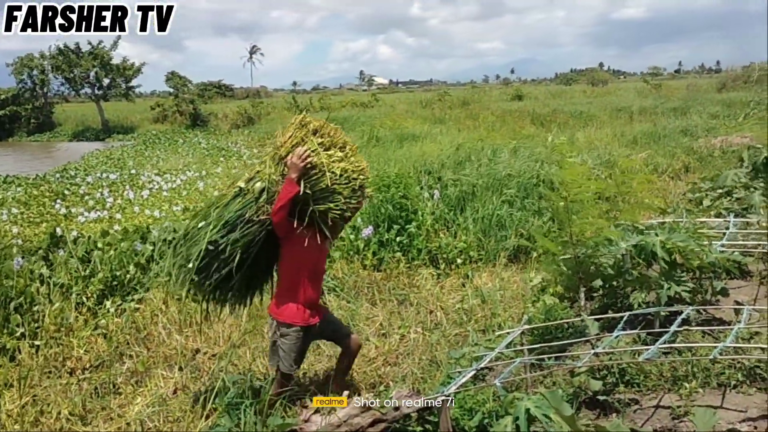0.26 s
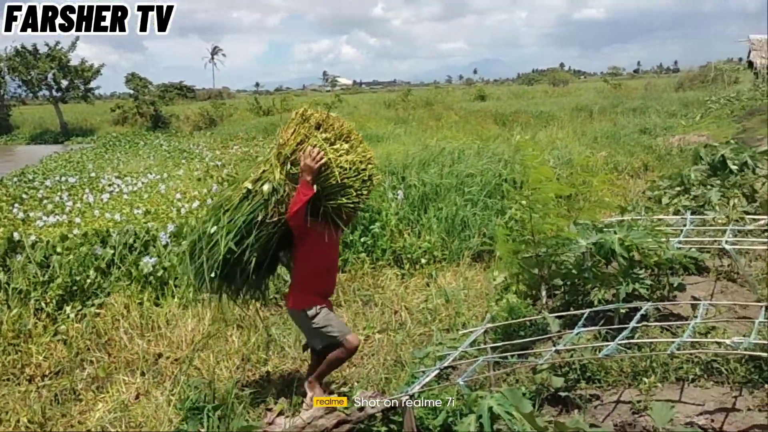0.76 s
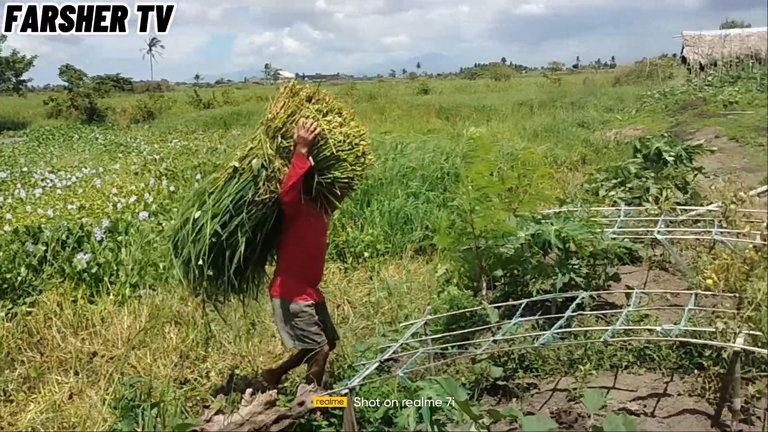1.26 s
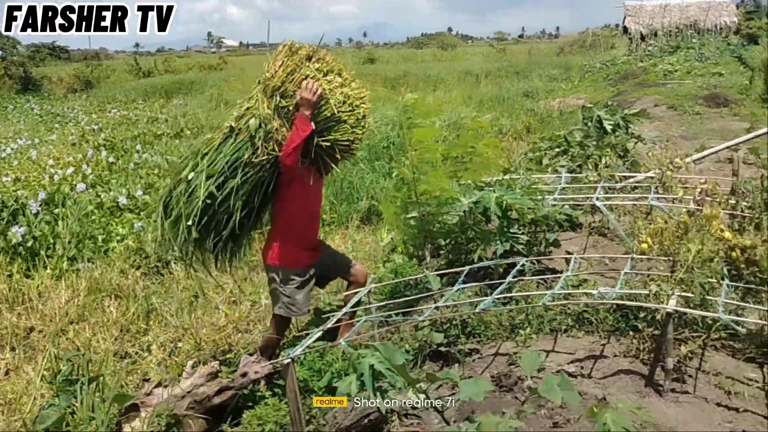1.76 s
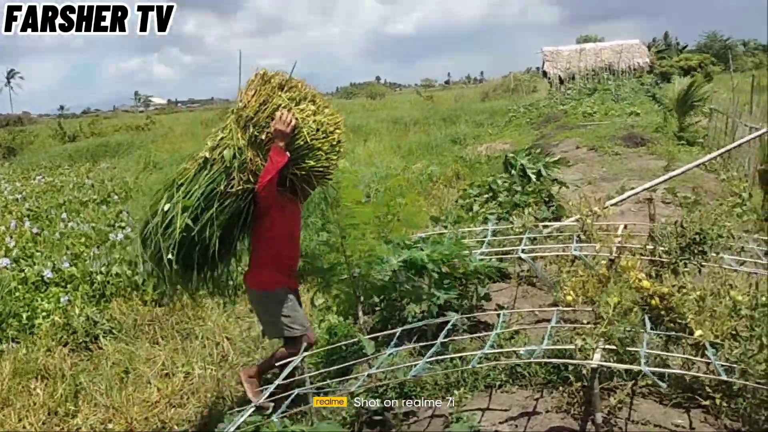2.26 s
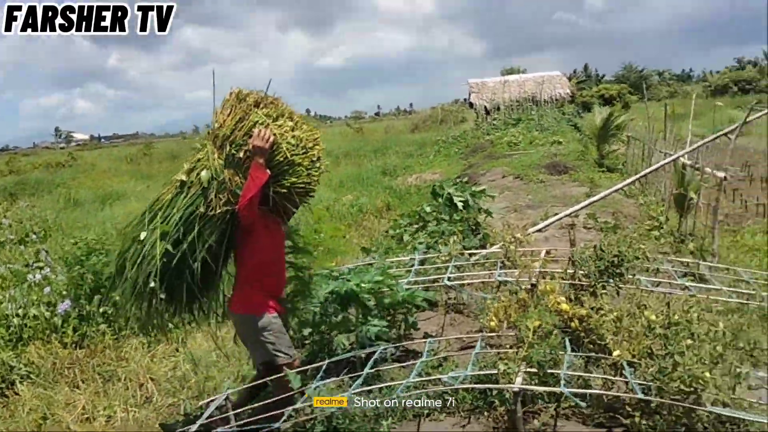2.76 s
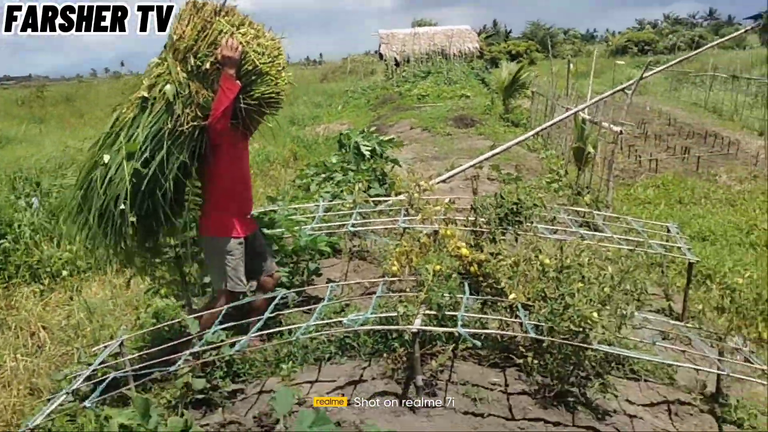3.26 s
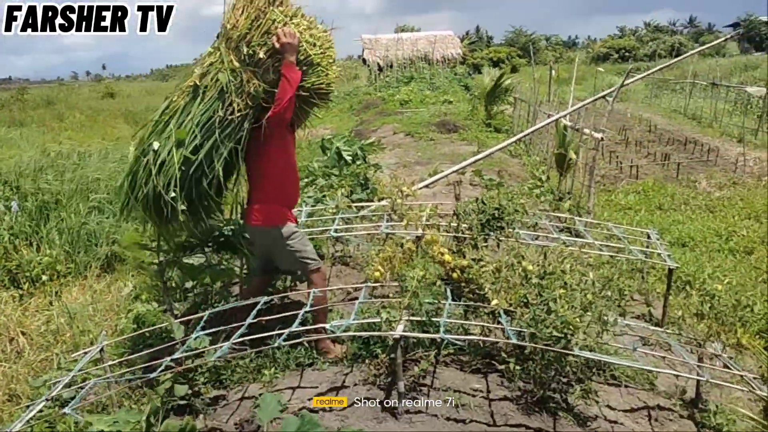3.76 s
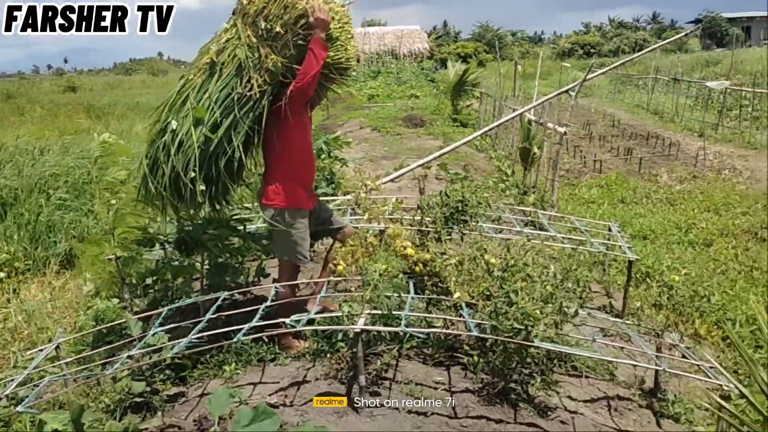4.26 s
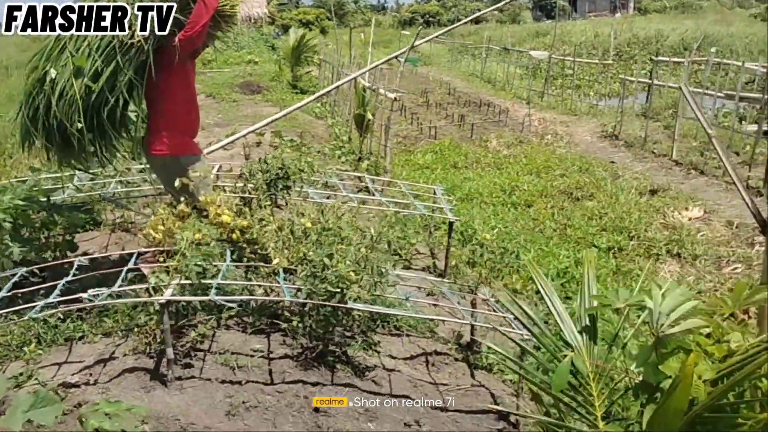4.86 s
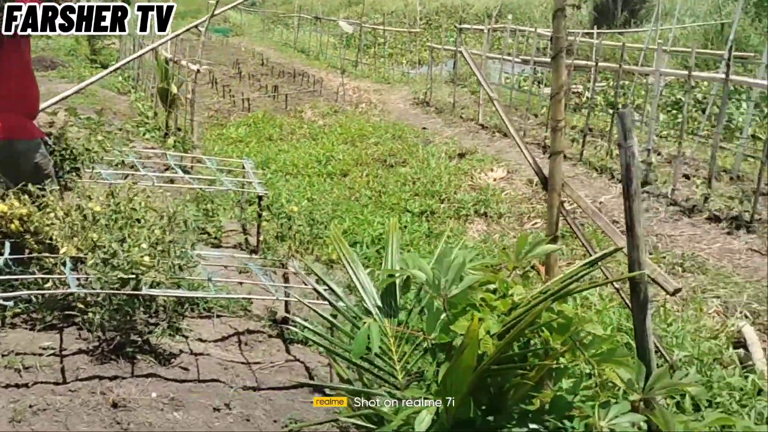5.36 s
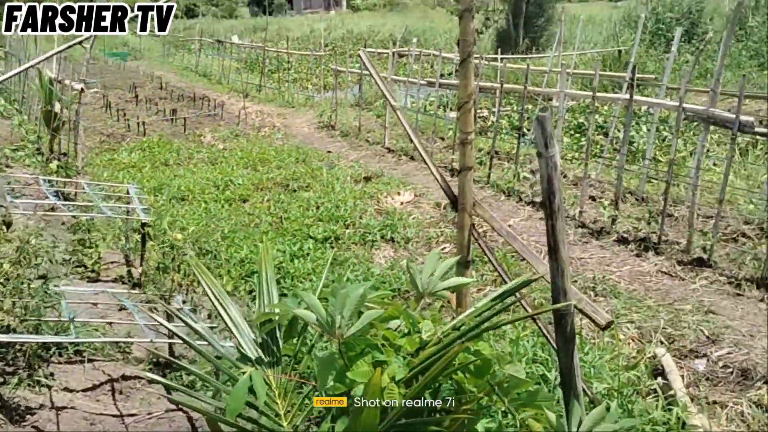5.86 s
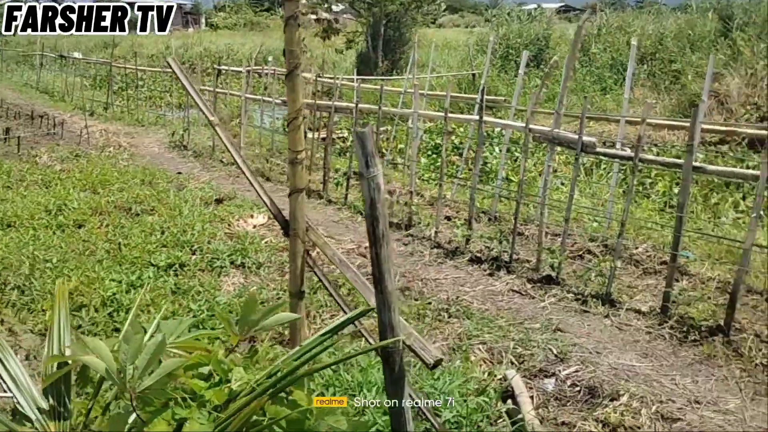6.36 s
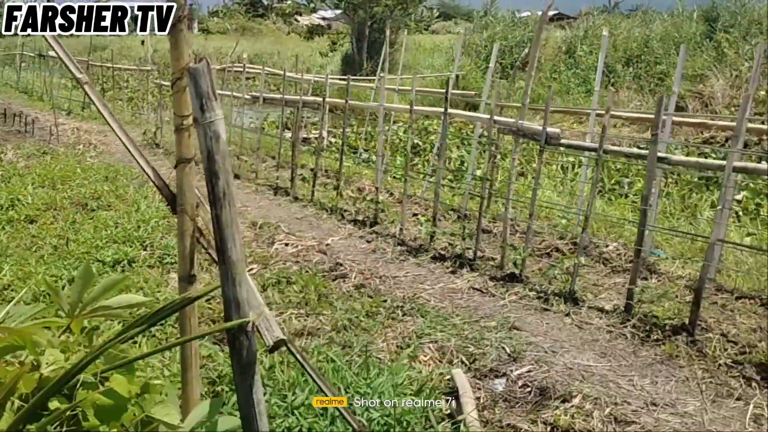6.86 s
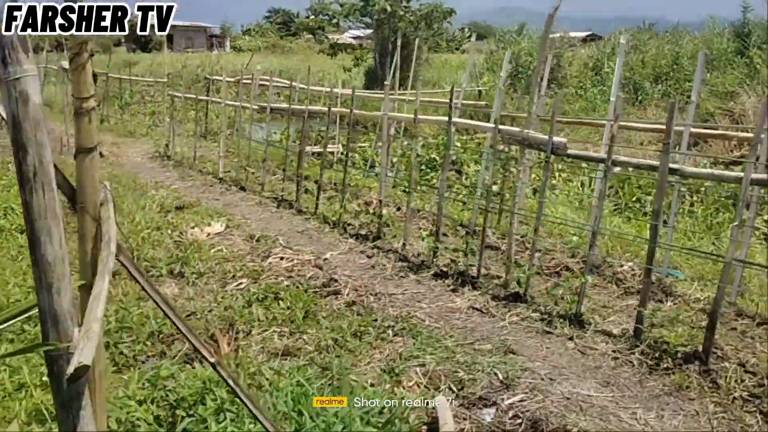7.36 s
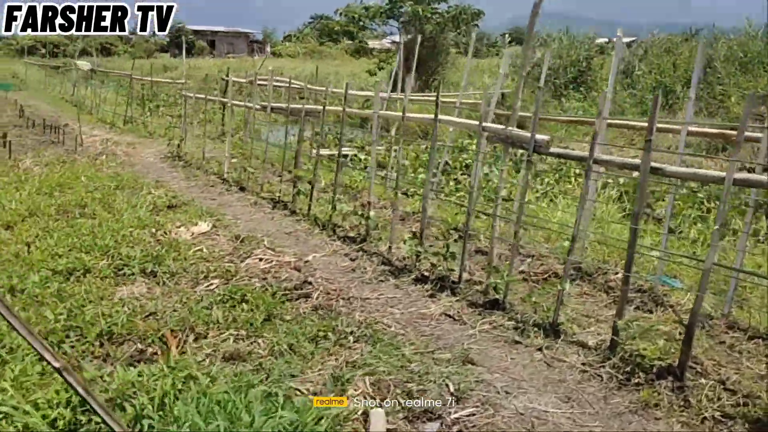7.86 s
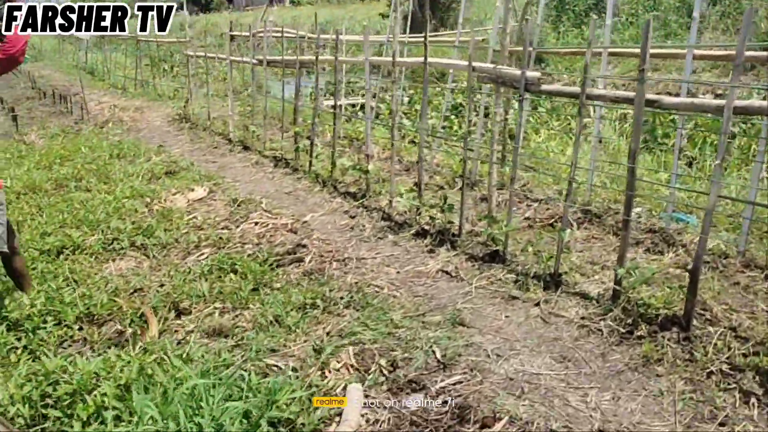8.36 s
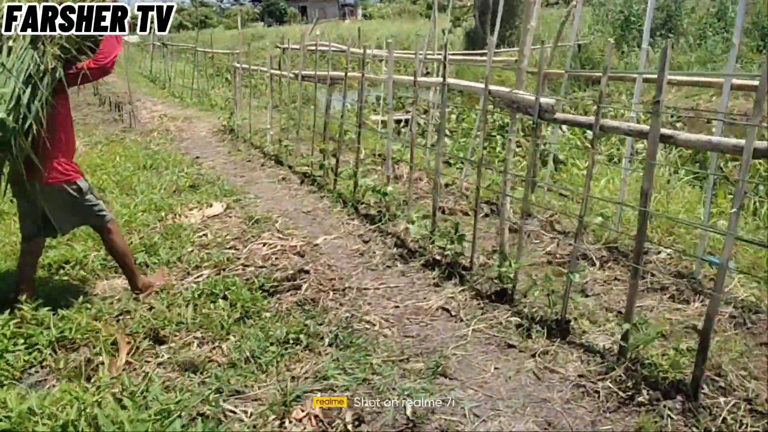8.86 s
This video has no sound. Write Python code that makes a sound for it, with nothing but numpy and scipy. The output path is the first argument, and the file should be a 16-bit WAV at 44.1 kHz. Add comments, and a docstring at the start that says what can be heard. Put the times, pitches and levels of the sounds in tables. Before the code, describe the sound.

Gusts bump the microphone strongly for the first two seconds, with soft swishes of carried grass a few metres away. A lull follows with faint chirps and a thin insect buzz. After a hard wind thump, dry stems crunch, then snap loudly close by, with bright hissing rustle continuing to the end. Open farmland, no echo, distant leaves and low roar.

```python
"""Wind thumps the microphone first, while someone walks a few metres off in a vegetable plot, then close by.
They carry a bundle of cut grass: stems crunch and snap, and blades hiss, as shaped noise and short rings.
Far birds chirp (gliding sine tones), a grasshopper buzzes once (pulsed tone) and a faint, wavering hum passes.
Wind is lumpy low noise with single pushes; far leaves and a dull roar are steady noise behind it all."""
import sys
import numpy as np
from scipy import signal
from scipy.fft import rfft, irfft, next_fast_len
from scipy.io import wavfile
from scipy.ndimage import uniform_filter1d, map_coordinates

SR = 44100
rng = np.random.default_rng(int(sys.argv[2]) if len(sys.argv) > 2 else 0)


def to_wav(sig):
    """Store sig (one row per channel, or 1-D mono) as 16-bit WAV at the path in sys.argv[1].

    Samples outside -1..1 are clipped; the rate is SR.
    """
    pcm = np.clip(np.atleast_2d(sig), -1, 1) * 32767
    pcm = np.round(pcm).astype(np.int16)
    wavfile.write(sys.argv[1], SR, pcm.T)  # frames by channels


N = 402191  # length in samples

# Colour tables give only the balance of the noise; its loudness is set elsewhere.
# Colour of the crunching stems: pitch_hz, relative_db
STEM_COLOUR = [(200, -39), (450, -13), (1000, -4.5), (2150, 0.5), (3400, -6.5), (4100, -11.5),
               (6000, -21.5), (8100, -24), (10000, -25), (15600, -65)]
# Colour of the hissing grass blades: pitch_hz, relative_db
BLADE_COLOUR = [(1500, -45), (4000, -2.5), (6000, -20), (8200, -4.5), (9600, -13.5), (11800, -12.5),
                (14000, -6.5), (15600, -0.5)]
# Colour of fibres crushed after a snap: pitch_hz, relative_db
CRUSH_COLOUR = [(200, -28), (450, -20), (900, 1), (1500, 0), (2200, 5.5), (3200, -8), (4300, -16),
                (6000, -17), (8100, -26), (15600, -50)]
# Swishes of the bundle at each stride: start_s, hold_s, stems_db, blades_db
SWISHES = [(.17, 0.011, -52, -47.5), (.24, .22, -60.5, -58), (.5, 0.033, -61.5, -58),
           (.63, 0.089, -61.5, -56), (.75, 0.076, -63, -57.5), (1.12, 0.014, -75, -63),
           (1.51, 0.016, -60, -64), (1.64, 0.035, -55.5, -57.5), (1.71, 0.11, -63, -59.5),
           (2.355, 0.013, -71, -58), (2.785, 0.024, -64, -58), (2.885, 0.0094, -66, -54.5),
           (3.2, 0.1, -64, -60.5), (3.31, 0.044, -62, -56.5), (3.42, 0.061, -68, -60),
           (3.8, 0.33, -71, -64), (4.25, 0.016, -64, -71), (5.35, 0.13, -64, -68), (5.58, 0.04, -50, -56),
           (5.7, 0.17, -60.5, -62.5), (6.41, .07, -54, -58.5), (6.5, .04, -46.5, -61),
           (6.57, 0.042, -51.5, -56), (6.86, 0.033, -47.5, -47), (6.91, 0.022, -42, -41),
           (6.99, 0.091, -51.5, -49.5), (7.22, 0.14, -58.5, -54), (7.375, .08, -46, -40.5),
           (7.485, 0.044, -40, -41.5), (7.56, 0.034, -42, -43), (7.65, 0.091, -53.5, -49),
           (7.96, 0.12, -57.5, -51), (8.14, 0.096, -53, -47.5), (8.32, 0.079, -46.5, -42.5),
           (8.41, 0.12, -45, -46), (8.75, 0.2, -51.5, -47.5), (9.075, 0.018, -53, -50),
           (9.105, .02, -46.5, -40.5)]
# Rustle between the swishes: time_s, stems_db, blades_db
QUIET_RUSTLE = [(0, -60.5, -62.5), (1, -62.5, -64), (1.4, -60, -65), (2, -64.5, -68), (2.7, -62.5, -65.5),
                (4.1, -61.5, -62.5), (4.85, -60.5, -65), (5.05, -63, -66.5), (5.55, -58, -62.5),
                (6.1, -67, -71), (6.37, -66.5, -69), (6.7, -56.5, -60.5), (7.9, -54.5, -55.5),
                (8.1, -57, -64), (8.65, -55.5, -50.5), (9.12, -54, -44)]
# Stems breaking: start_s, peak_db, ring_hz, hollow_body_db (relative to the peak)
SNAPS = [(.168, -41, 1560, -8), (.373, -45, 2480, -3), (.795, -45, 3000, -17), (0.836, -44, 2500, -20),
         (.849, -46, 3300, -18), (1.185, -47, 1470, -5), (1.308, -33.5, 1060, -11), (1.335, -39, 930, -7),
         (1.511, -48, 2680, -9), (2.075, -41.5, 2600, -18), (2.893, -47, 2430, -12),
         (5.324, -34, 1750, -2.5), (5.517, -40.5, 2360, -21), (5.552, -35.5, 2130, -26),
         (5.573, -40, 2490, -20), (5.599, -43, 2330, -22), (5.902, -37, 2260, -15), (6.394, -46, 1870, -7),
         (6.425, -33.5, 1770, -15), (6.473, -34, 2370, -23), (6.494, -33, 1700, -32),
         (6.508, -24.5, 1360, -41), (6.513, -22.5, 1600, -35), (6.52, -28, 1910, -37),
         (6.527, -25.5, 1450, -35), (6.586, -18, 1480, -11.5), (6.644, -37.5, 1520, -10),
         (6.854, -33, 2030, -20), (6.875, -37, 2240, -20), (6.921, -32, 2190, -29), (6.937, -37, 2300, -25),
         (6.954, -40, 2600, -25), (7.092, -32.5, 1780, -29), (7.116, -38, 2200, -25),
         (7.222, -37.5, 2190, -18), (7.366, -50, 1660, -24), (7.437, -32, 2010, -11),
         (7.482, -30, 1900, -12), (7.499, -33, 1500, -20), (7.552, -41, 1500, -20), (7.566, -18, 2070, -37),
         (7.577, -21, 1330, -29), (7.642, -33, 1530, -26), (7.666, -33, 1400, -26), (7.758, -34, 2220, -32),
         (7.847, -38.5, 1310, -2.5), (7.972, -21, 1580, -40), (8.079, -41, 2400, -26),
         (8.311, -38, 2170, -29), (8.325, -17, 1270, -33), (8.347, -33, 2190, -29),
         (8.374, -27.5, 2220, -17), (8.384, -9, 1950, -46), (8.429, -34.5, 1900, -9),
         (8.487, -28, 1750, -30), (8.513, -32.5, 1250, -23), (8.537, -42, 1920, -25),
         (8.559, -38, 2570, -28), (8.746, -46, 2030, -30), (8.837, -35, 2170, -29)]
# Short treble ticks in the rustle: start_s, level_db, microphone_resonance_hz
TREBLE_TICKS = [(0.613, -42, 15200), (6.7955, -41, 15100), (6.9985, -46, 15000), (7.1726, -37, 15000),
                (7.2235, -34.5, 15000), (7.3662, -31, 15000), (7.388, -26, 15400), (7.538, -25, 15400),
                (7.5667, -40, 7200), (7.733, -39, 15200), (7.7583, -34, 8340), (7.8042, -38, 14300),
                (7.901, -42, 7750), (7.973, -33, 8230), (8.2265, -37, 7660), (8.473, -34, 14500),
                (8.755, -28, 7800), (8.836, -40, 15000), (8.872, -41, 15400), (9.079, -42, 15200)]
# Colour of buffeting in light wind: pitch_hz, relative_db
BREEZE_COLOUR = [(15, -50), (25, -34), (38, -10.5), (69, 1), (97, 4), (175, -7), (268, -28.5), (450, -59),
                 (580, -77), (990, -120)]
# Colour of buffeting in a gust: pitch_hz, relative_db
GUST_COLOUR = [(15, -54), (25, -21), (43, -27), (83, 3.5), (134, 0.5), (185, -2.5), (405, -23.5),
               (607, -49), (800, -48), (1040, -90), (1760, -120)]
# Colour of the finest eddies: pitch_hz, relative_db
FINE_COLOUR = [(200, -28), (330, -1.5), (420, 3), (560, -7.5), (720, -17.5), (1000, -52)]
# Gusts on the microphone: start_s, hold_s, buffeting_db, finest_eddies_db
GUSTS = [(0, 0.065, -37, -62.5), (.15, 0.29, -32.5, -79), (.51, 0.078, -44, -83), (.62, .04, -49, -80),
         (.7, 0.034, -46, -79), (.79, 0.056, -46.5, -82), (.86, 0.31, -33, -62), (1.2, 0.271, -34, -47.5),
         (1.51, 0.2, -32.5, -56.5), (1.78, 0.32, -37, -73), (2.29, 0.065, -46.5, -88),
         (2.43, 0.043, -53, -90), (2.6, 0.13, -53, -90), (4.4, .12, -43, -90), (4.56, 0.15, -44.5, -90),
         (4.78, .12, -39.5, -90), (4.99, 0.12, -42.5, -90), (5.22, 0.21, -49.5, -88),
         (5.52, 0.095, -48, -90), (5.64, 0.039, -53.5, -90), (6.02, 0.058, -54.5, -90),
         (6.12, 0.15, -41.5, -90), (6.38, 0.03, -53.5, -90), (6.47, 0.075, -52.5, -92),
         (6.8, 0.083, -39, -88), (6.93, 0.18, -46, -90), (7.47, 0.2, -44, -88), (7.68, 0.073, -49, -90),
         (8.85, 0.31, -62, -86)]
# Single strong eddies: start_s, peak_db, pitch_hz
PUFFS = [(0.019, -20.5, 131), (.132, -35, 140), (.31, -24.5, 157), (.409, -20, 146), (0.91, -23, 101),
         (1, -21, 204), (1.171, -13.5, 146), (1.328, -14.5, 156), (1.439, -14.5, 134), (1.512, -13.5, 148),
         (1.557, -19.5, 142), (1.588, -15.5, 106), (1.629, -14.5, 127), (1.678, -25.5, 164),
         (1.802, -18.5, 135), (1.854, -16.5, 119), (1.925, -17, 115), (2.046, -28, 129), (2.137, -22.5, 95),
         (2.286, -38, 108), (2.733, -35.5, 85), (3.004, -40, 154), (3.16, -43, 96), (3.289, -47, 95),
         (3.47, -46.5, 97), (3.559, -43, 95), (3.884, -34.5, 127), (4.244, -35.5, 107), (4.459, -29.5, 114),
         (4.56, -24.5, 110), (4.62, -22, 91), (4.708, -24, 150), (4.819, -19, 85.5), (4.998, -28, 107),
         (5.04, -22.5, 114), (5.088, -29, 110), (5.215, -38, 105), (5.448, -37, 81), (5.481, -11.5, 156),
         (5.561, -28.5, 130), (5.577, -30, 159), (6.122, -46, 96), (6.237, -23, 108.5), (6.47, -38.5, 120),
         (6.821, -23, 91), (6.848, -23, 96), (6.891, -23, 90), (7.33, -42.5, 95), (7.487, -27.5, 100),
         (7.609, -24, 96), (7.658, -32, 128), (8.069, -47, 90), (8.318, -44, 89), (8.75, -50, 90)]
# Bird whistles: start_s, length_s, start_hz, end_hz, level_db
CHIRPS = [(.255, 0.0084, 3520, 4800, -53), (0.263, .016, 4700, 4700, -62), (1.346, 0.13, 1405, 1434, -61.5),
          (0.278, 0.036, 2960, 2910, -55), (.985, 0.055, 3330, 3700, -60), (2.416, 0.012, 4200, 4250, -59),
          (2.477, 0.011, 4200, 4170, -64), (2.548, 0.017, 3870, 3920, -59),
          (2.573, 0.018, 2830, 2700, -49.5), (4.031, .02, 4500, 4440, -58), (4.05, 0.017, 2955, 2820, -52),
          (5.291, 0.026, 3950, 4570, -58), (5.304, 0.018, 4500, 3160, -58), (0.27, 0.0077, 4500, 3000, -51),
          (.718, 0.016, 7900, 7650, -73), (.862, .016, 8000, 7500, -69), (1.03, 0.018, 7900, 7560, -64),
          (1.193, .016, 7900, 7500, -67), (1.468, .012, 7800, 7600, -65), (1.508, .014, 7800, 7550, -69),
          (3.796, 0.044, 8200, 8050, -64)]
# Grasshopper buzz: time_s, level_db, wing_hz, strokes_per_s
HOPPER = [(2.14, -112, 10700, 110), (2.2, -82, 10700, 120), (2.5, -78, 10800, 110), (2.74, -75, 10900, 123),
          (2.79, -81, 10900, 122)]
# The passing hum: time_s, level_db, pitch_hz
HUM = [(5.55, -90, 178), (5.68, -64.5, 178.4), (6.0, -64.5, 175), (6.35, -62.5, 179.6), (6.55, -61, 191),
       (6.72, -62.5, 183), (6.8, -88, 184)]
# Colour of leaves far off in the wind: pitch_hz, relative_db
LEAF_COLOUR = [(410, -47), (700, -0.5), (1760, -3), (3000, -2), (4090, -5.5), (6450, -28.5), (8260, -8.5),
               (10400, -21.5), (12300, -24), (14800, -49), (15600, -11.5)]
# Colour of the roar over the far fields: pitch_hz, relative_db
ROAR_COLOUR = [(150, -4), (240, -1), (330, 0), (500, 2.5), (750, -3.5), (1100, -8.5), (2000, -41)]
# Loudness of that dull roar: time_s, level_db
FAR_WIND = [(0, -64.5), (1, -68.5), (3.7, -67.5), (4.5, -64.5), (5.5, -60.5), (5.9, -65), (7.5, -63.5),
            (9.12, -65)]

SWISH_RISE, SWISH_FALL = 430, 224  # dB a second before and after the hold
STALK_WIDTH_HZ, STALK_DB = 460, -7.5  # width of each stalk's ring; level against the stems
CRUNCH_DB, CRUNCH_GROWS, CRUNCH_MS = -44, 0.84, 39.5  # after a -29.5 dB snap; dB per dB of snap; 60 dB decay
EDGE_DB, EDGE_GROWS = -57, 0.4  # treble edge of a -30 dB snap; dB per dB of snap
TICK_MS = 14.5  # time to fade by 60 dB
GUST_RISE, GUST_FALL = 275, 296  # dB a second before and after the hold
CALM_DB, STEADY_DB = -64.5, -30  # between gusts; ceiling on buffeting before its quick wobbles
WAKE_DB, WAKE_S = -13.5, 0.019  # buffeting around a puff, relative to its peak; how long it holds
WAKE_RISE, WAKE_FALL = 1700, 640  # dB a second before and after that hold
PUFF_CYCLES = 0.59  # half length of a puff's push
LEAVES_DB = -62.5


def amp(db):
    """Gain of a level in dB."""
    return 10 ** (np.asarray(db) / 20)


def decibels(power):
    """Level in dB of a power."""
    return 10 * np.log10(power + 1e-20)


def unit(x):
    """x at an average (rms) level of 1."""
    return x / np.sqrt(np.mean(x ** 2) + 1e-20)


def peak(x):
    """x with its largest swing at 1."""
    return x / np.abs(x).max()


def curves(rows):
    """One value per sample for each column after the time."""
    s, *cols = np.transpose(rows)
    return [np.interp(np.arange(N) / SR, s, c) for c in cols]


def swells(rows, rise, fall):
    """For each dB column, the summed power of (start, hold) events that rise and fall at set dB a second."""
    t = np.arange(0, N + 64, 64) / SR
    start, hold, *levels = np.transpose(rows)[..., None]
    before = rise * (start - t)
    after = fall * (t - start - hold)
    under_db = np.maximum(0, np.maximum(before, after))
    powers = [(amp(db - under_db) ** 2).sum(axis=0) for db in levels]
    return [np.interp(np.arange(N) / SR, t, power) for power in powers]


def wobble(rate):
    """A smooth random curve through rate random points a second."""
    at = np.arange(0, N + 8, 8)
    knots = rng.standard_normal(int(N * 400 / SR) + 4)
    return np.interp(np.arange(N), at, map_coordinates(knots, [at * rate / SR]))


def filtered(x, response):
    """x with each frequency multiplied by a response."""
    m = next_fast_len(N + SR // 2)  # spare room so that tails do not wrap round
    return irfft(rfft(x, m) * response(np.fft.rfftfreq(m, 1 / SR)), m)[:N]


def coloured(x, spectrum):
    """x shaped through (Hz, dB) points, at rms 1."""
    f, db = np.transpose(spectrum)
    return unit(filtered(x, lambda hz: amp(np.interp(np.log(hz + 1), np.log(f + 1), db))))


def patchy(depth_db, wide, long):
    """Noise with random loud and soft patches, smoothed over wide frequency bins and long time frames."""
    z = signal.stft(rng.standard_normal(N), nperseg=256)[2]
    patches = uniform_filter1d(rng.standard_normal(z.shape), wide, 0)
    patches = uniform_filter1d(patches, long, 1)
    return signal.istft(z * amp(depth_db * unit(patches)), nperseg=256)[1][:N]


def crackle(per_s, spread_db):
    """Sparse contacts: many faint ones, few strong ones."""
    chance, sign, size = rng.random(N), rng.standard_normal(N), rng.exponential(size=N)
    hit, out = chance < per_s / SR, np.zeros(N)
    out[hit] = sign[hit] * amp(spread_db * np.minimum(size[hit], 3.5))
    return unit(out)


def add(track, s, sound):
    """Mixes a sound into the track at s seconds."""
    part = track[round(s * SR):][:len(sound)]
    part += sound[:len(part)]


def rustle():
    """Stems crunch in the middle range and blades hiss on top: dense contacts on a bed of rubbing noise."""
    swishes = swells(SWISHES, SWISH_RISE, SWISH_FALL)
    stems_quiet_db, blades_quiet_db = curves(QUIET_RUSTLE)
    stems_db = decibels(swishes[0] + amp(stems_quiet_db) ** 2)
    blades_db = decibels(swishes[1] + amp(blades_quiet_db) ** 2)
    sway = wobble(18)
    shake = wobble(45)  # the bundle jerks as one
    busy = np.clip((stems_db + 67.0) / 16, 0.15, 1)  # close by, single contacts stand out

    crunch = 1.94 * patchy(2.15, wide=4, long=3) + busy * crackle(per_s=900, spread_db=4.5)
    hiss = patchy(2.3, wide=8, long=4) + 0.5 * crackle(per_s=650, spread_db=4.0)
    stems_db = stems_db + 0.92 * sway + busy * (1.02 * shake + 1.27 * wobble(120))
    blades_db = blades_db + 1.66 * sway + 0.83 * shake + 0.92 * wobble(30)
    stems = amp(stems_db) * (coloured(crunch, STEM_COLOUR) + amp(STALK_DB) * busy * stalks())
    blades = amp(blades_db) * coloured(hiss, BLADE_COLOUR)
    return stems + blades


def stalks():
    """Small stalks crack by chance inside the bundle, each ringing for a few cycles at its own pitch."""
    def ring(centre):
        def response(f):
            width = 1j * f * STALK_WIDTH_HZ
            return (width / (centre * centre - f * f + width)) ** 2
        return response

    pitches_hz = (1310, 1680, 2090, 2560)
    return unit(sum(filtered(crackle(per_s=45, spread_db=4.5), ring(hz)) for hz in pitches_hz))


def breaks():
    """A snapping stem gives a ring, a hollow body, a treble edge and crunching fibres; short treble ticks join in."""
    out, crunch, edge = np.zeros(N), np.zeros(N), np.zeros(N)
    t = np.arange(SR // 6) / SR

    def dying(t60_ms):
        return amp(-60 * t / (t60_ms / 1000 + 0.0002))

    def rising(ms):
        return (1 - np.exp(-1000 * t / (ms + 0.012))) ** 2

    for s, db, hz, body_db in SNAPS:
        ring = np.sin(2 * np.pi * hz * t)
        ring += 0.46 * np.sin(2 * np.pi * hz * rng.uniform(0.74, 1.6) * t)
        ring += 0.5 * uniform_filter1d(rng.standard_normal(len(t)), size=8)  # splinters roughen it
        ring *= rising(0.58) * dying(4.58)
        delay = int(rng.uniform(0.001744, 0.0033) * SR)
        second_fibre = 0.29 * np.pad(ring, (delay, 0))[:len(t)]  # gives way just after
        body = rising(0.82) * dying(7.1) * np.sin(2 * np.pi * 560 * t)
        add(out, s, amp(db) * peak(ring + second_fibre) + amp(db + body_db) * peak(body))

        # fibres change loudness at random every 40 samples
        grain = amp(2.9 * rng.exponential(size=len(t) // 40 + 1)).repeat(40)[:len(t)]
        fibres = rng.standard_normal(len(t)) * grain
        crunch_db = CRUNCH_DB + CRUNCH_GROWS * (db + 29.5)
        add(crunch, s, amp(crunch_db) * rising(0.68) * dying(CRUNCH_MS) * fibres)
        edge_db = EDGE_DB + EDGE_GROWS * (db + 30)
        add(edge, s, amp(edge_db) * rising(0.6) * dying(13) * rng.standard_normal(len(t)))

    for s, db, hz in TREBLE_TICKS:
        tick = rng.standard_normal(len(t)) + 0.54 * np.sin(2 * np.pi * hz * t)
        add(edge, s, amp(db) * rising(0.75) * dying(TICK_MS) * tick)
    crunch = coloured(crunch, CRUSH_COLOUR) * np.std(crunch)  # colour it, keep its loudness
    edge = coloured(edge, BLADE_COLOUR) * np.std(edge)
    return out + crunch + edge


def wind():
    """Eddies thump on the microphone in lumps; stronger wind brings smaller, brighter eddies more steadily."""
    gusts, finest = swells(GUSTS, GUST_RISE, GUST_FALL)
    wake_rows = [(s, WAKE_S, db + WAKE_DB) for s, db, _ in PUFFS]
    wakes, = swells(wake_rows, WAKE_RISE, WAKE_FALL)
    calm = amp(CALM_DB + 1.8 * wobble(9)) ** 2
    power = calm + gusts * amp(1.26 * wobble(16)) ** 2 + wakes
    level_db = np.minimum(decibels(power), STEADY_DB)
    steady = np.clip((level_db + 78.0) / 18, 0, 1)
    level_db = level_db + (1 - 0.45 * steady) * (2.2 * wobble(35) + 2.48 * wobble(70))

    strong = np.clip((level_db + 48.5) / 18, 0, 1)  # 0 is a breeze, 1 a full gust
    eddies = rng.standard_normal(N) + 0.5 * crackle(per_s=90, spread_db=2)
    buffet = np.sqrt(1 - strong) * coloured(eddies, BREEZE_COLOUR)
    buffet += np.sqrt(strong) * coloured(eddies, GUST_COLOUR)
    out = amp(level_db) * buffet

    for s, db, hz in PUFFS:
        u = (np.arange(SR // 20) / SR - 0.0115) * hz  # cycles from the middle of the push
        push = np.exp(-(u / PUFF_CYCLES) ** 2) * np.cos(2 * np.pi * u + rng.normal(0, 0.26))
        # the pressure turns sharply at its peak
        knock = 0.38 * (1 - 2 * (u / 0.26) ** 2) * np.exp(-(u / 0.19) ** 2)
        add(out, s, -amp(db) * peak(push + knock))

    flutter = np.sqrt(finest) * amp(4.7 * wobble(12) + 1.7 * wobble(44.43))
    return out + flutter * coloured(rng.standard_normal(N), FINE_COLOUR)


def birds():
    """Short gliding whistles from far off, blurred by the air and by leaves that scatter them."""
    out, warble_hz = np.zeros(N), 40 * wobble(200)
    for s, length, start_hz, end_hz, db in CHIRPS:
        u = np.linspace(0, 1, int(length * SR) + 2)
        pitch_hz = start_hz + (end_hz - start_hz) * u + warble_hz[round(s * SR):][:len(u)]
        swell = np.abs(np.sin(np.pi * u)) ** 0.52
        add(out, s, amp(db) * swell * np.sin(2 * np.pi * np.cumsum(pitch_hz) / SR))
    t = np.arange(SR // 20) / SR
    scatter = rng.standard_normal(len(t)) * amp(-60 * t / 0.078)
    return out + amp(-4) * signal.fftconvolve(out, scatter / np.linalg.norm(scatter))[:N]


def inside(rows):
    """True between the first and last times of a table."""
    n = np.arange(N)
    return (n > rows[0][0] * SR) & (n < rows[-1][0] * SR)


def grasshopper():
    """Each stroke rings the wing for a moment."""
    db, wing_hz, strokes = curves(HOPPER)
    stroke = np.exp(-3.5 * (np.cumsum(strokes) / SR % 1))  # jumps up, then dies away
    wing = np.sin(2 * np.pi * np.cumsum(wing_hz + 90 * wobble(300)) / SR)
    return amp(db) * unit(stroke) * wing * inside(HOPPER)


def passing_hum():
    """A low tone with a weak overtone at twice its pitch wavers in pitch and level."""
    db, hz = curves(HUM)
    turn = 2 * np.pi * np.cumsum(hz + 3.04 * wobble(53)) / SR
    tone = np.sin(turn) + 0.22 * np.sin(2 * turn)
    return amp(db + 3.6 * wobble(8.5)) * tone * inside(HUM)


def field():
    """Leaves far off hiss evenly over a dull roar."""
    roar_db, = curves(FAR_WIND)
    roar = coloured(patchy(2.7, wide=2, long=16), ROAR_COLOUR)
    leaves = coloured(patchy(1.0, wide=4, long=5), LEAF_COLOUR)
    return amp(roar_db + 0.12 * wobble(4)) * roar + amp(LEAVES_DB + 0.32 * wobble(3.44)) * leaves


def scene():
    """All sources at one microphone."""
    bundle = rustle() + breaks()
    return (bundle + wind() + birds() + grasshopper() + passing_hum() + field())[None]


def record(dry):
    """The phone cuts the lowest bass and keeps nothing from 15600 Hz up."""
    def response(hz):
        bass_cut = (1j * hz / (38 + 1j * hz)) ** 4
        return bass_cut * (hz < 15600)
    return filtered(dry[0], response)[None]


dry = scene()
out = record(dry)
to_wav(out)
```